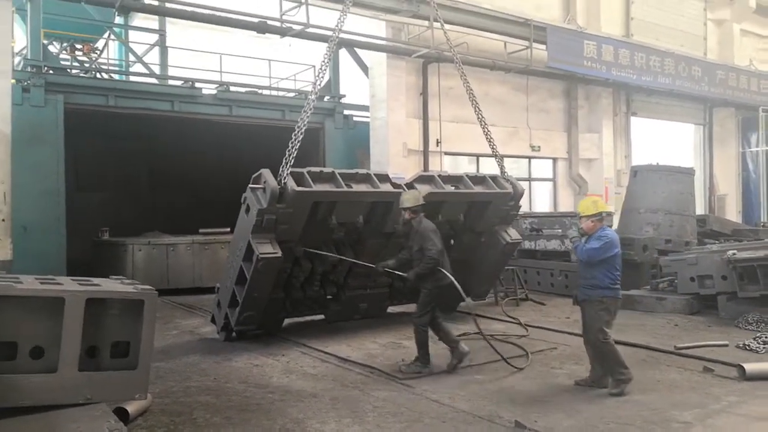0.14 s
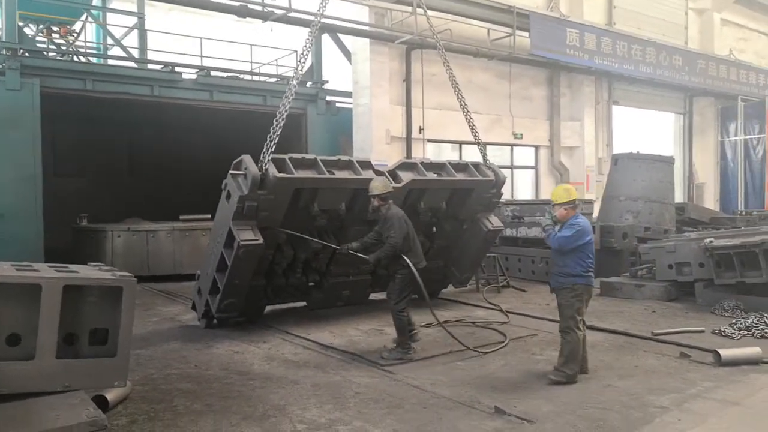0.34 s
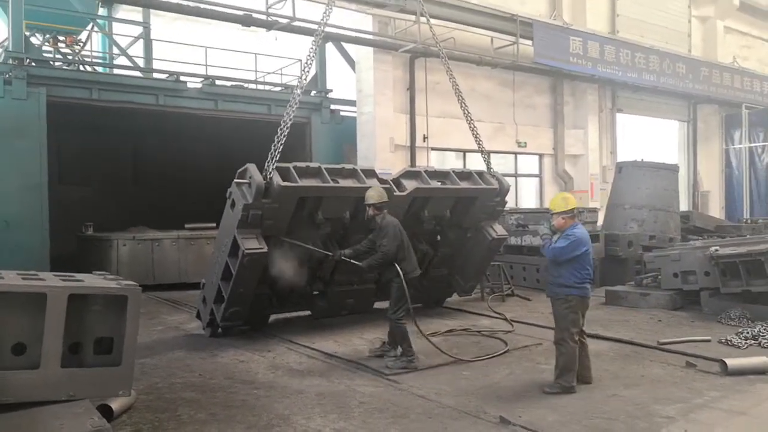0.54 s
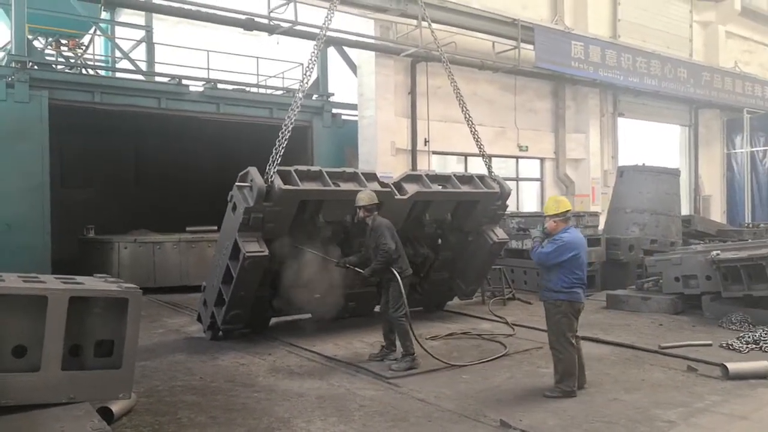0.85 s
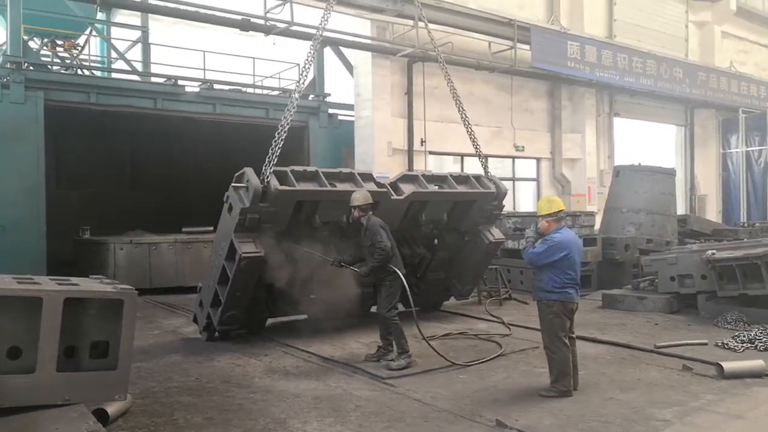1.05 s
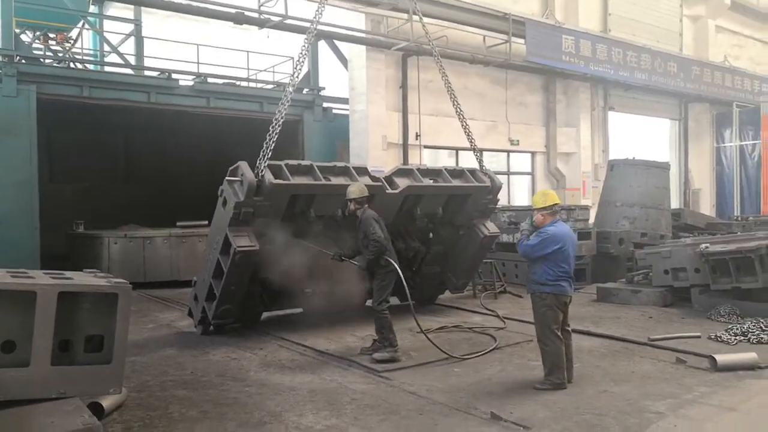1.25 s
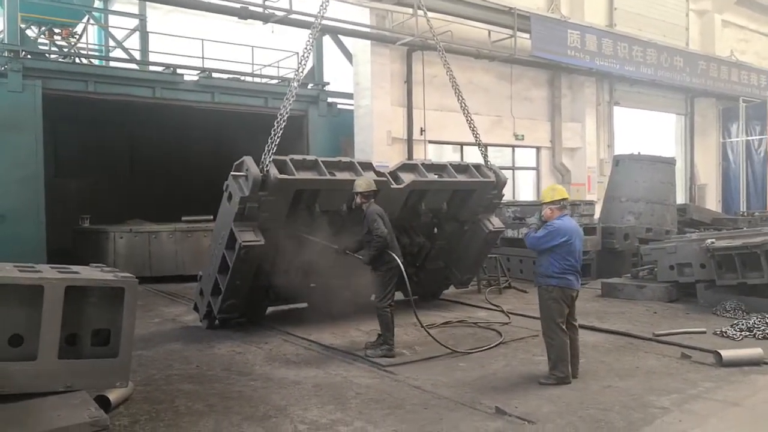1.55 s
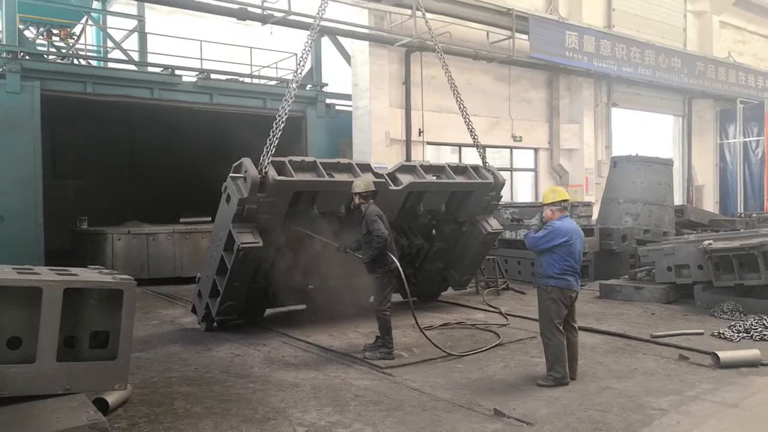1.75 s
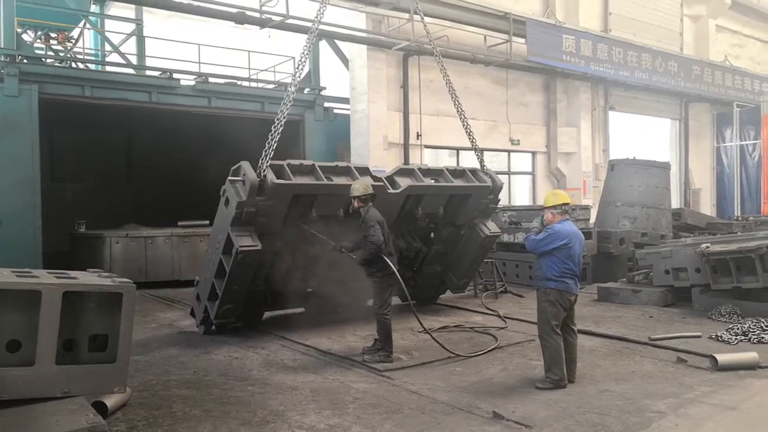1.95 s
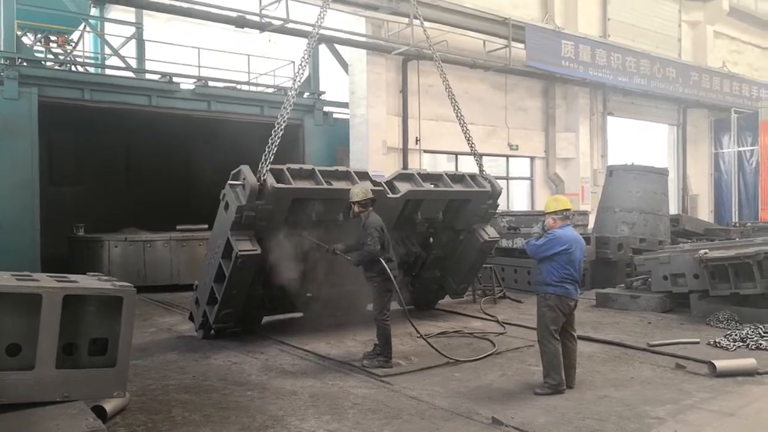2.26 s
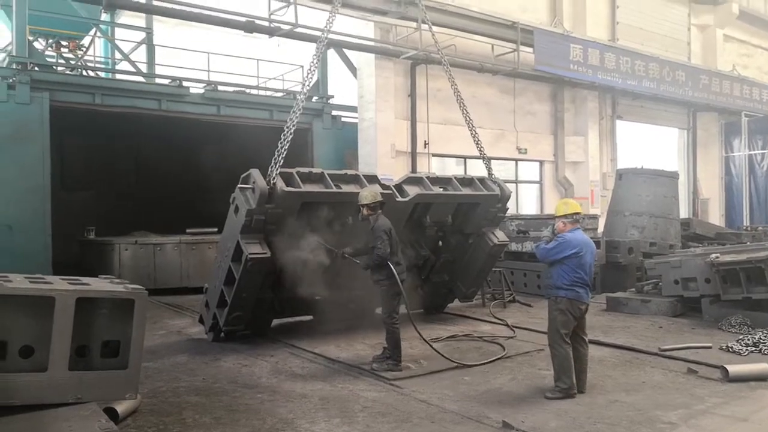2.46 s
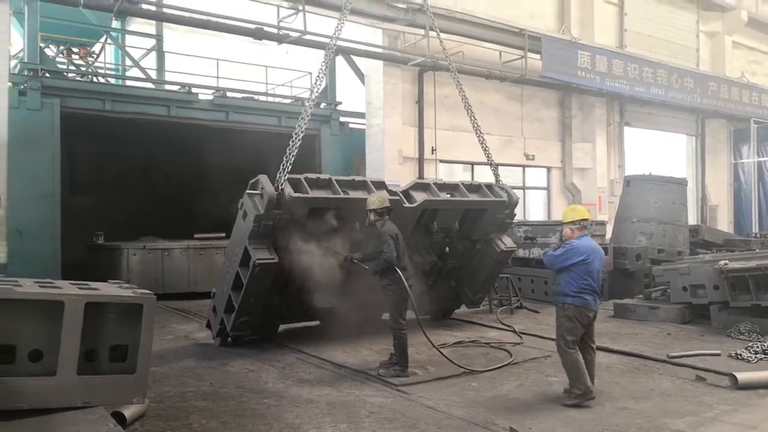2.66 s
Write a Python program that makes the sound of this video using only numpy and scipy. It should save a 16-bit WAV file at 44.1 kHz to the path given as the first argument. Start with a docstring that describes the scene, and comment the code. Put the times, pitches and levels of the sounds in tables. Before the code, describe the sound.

Compressed air hisses loudly over a heavy metal casting, swelling from 0 to full by about 0.25 s, then steady with slight wavering to the end, with a fuzzy, high whistle near 6 kHz. It sits right; the left is duller. A metal crash rings and fades over the first second. Dull metal knocks come faintly at 0.8 s, stronger around 1.9, 2.3 and 2.7 s. Low hall wash and hum throughout.

```python
"""A large hall holds a low wash and hum throughout, while a metal crash at the start dies away.
Almost at once an air lance opens off to the right and hisses over a ribbed metal casting.
Its nozzle whistles near 6 kHz; dull knocks on heavy metal follow from 0.8 s on.
Hiss, whistle, wash and thuds are shaped noise; the metal rings are sums of fading tones.
The noise in the left channel is much duller, and the lance reaches the left later."""
import sys
import numpy as np
from scipy import signal
from scipy.io import wavfile
from scipy.ndimage import uniform_filter1d

SR = 44100
rng = np.random.default_rng(int(sys.argv[2]) if len(sys.argv) > 2 else 0)


def wrap_up_sound(samples):
    """Save the sound to the file named by the first command line argument, as 16-bit audio."""
    columns = np.atleast_2d(samples).T
    # keep every value between -1 and 1, then stretch to whole-number steps
    tamed = np.clip(columns, -1, 1)
    steps = np.round(tamed * 32767).astype(np.int16)
    wavfile.write(sys.argv[1], SR, steps)


def undo_db(level):
    """Turn decibels back into plain size, where 20 dB means ten times bigger."""
    steps = np.asarray(level, float) / 20
    return 10 ** steps


N = 123921  # length in samples
OPEN_S = 0.24  # time by which the valve is open

# how alike left and right are in the hall, 1 = same, -1 = opposite: pitch_hz, likeness
LIKENESS = [(60, 1), (200, 0.91), (320, 0.84), (500, -0.46), (750, -0.3), (1150, 0.25), (1800, 0.24),
            (3000, 0.54)]


def evened(x):
    """Scales to rms 1."""
    return x / np.sqrt(np.mean(x ** 2) + 1e-20)


def read(points, hz):
    """Reads a spectrum table on a log-frequency axis, since pitch is heard in ratios."""
    f, value = np.transpose(points)
    return np.interp(np.log(hz + 1), np.log(f + 1), value)


def along(table, t, axis=1):
    """Reads one column of a time table, with straight lines between its rows."""
    rows = np.array(table)
    return np.interp(t, rows[:, 0], rows[:, axis])


def grid(size):
    """Gives bin frequencies in Hz (column) and frame times in s (row)."""
    hz = np.fft.rfftfreq(size, 1 / SR)[:, None]
    return hz, np.arange(4 * N // size + 5) * size / 4 / SR


def blotches(hz, t, bins, frames):
    """Smooth random field over frequency and time, made by averaging random numbers."""
    field = rng.standard_normal((len(t), len(hz))).T
    field = uniform_filter1d(field, bins, 0, mode="wrap")
    return evened(uniform_filter1d(field, frames, 1, mode="wrap"))


def noise(hz, db, likeness):
    """Stereo noise from a dB field: left shares part of right, adds its own part and has its own tone colour."""
    # level of left against right at each pitch: pitch_hz, left_minus_right_db
    left_colour = [(400, 0.5), (750, -2.5), (1150, -1), (1750, -4.5), (2700, -12.5), (4100, -13),
                   (5600, -19.5), (8500, -48), (11000, -19), (13300, -42), (14100, -50)]
    a, b, c, d = rng.standard_normal((db.shape[1], len(hz), 4)).T
    right = a + 1j * b
    own_part = np.sqrt(1 - np.clip(abs(likeness), 0, 1) ** 2) * (c + 1j * d)
    left = likeness * right + own_part
    left_gain = undo_db(read(left_colour, hz))
    # db sets the level of the average of left and right
    mid_size = np.sqrt(1 + left_gain ** 2 + 2 * left_gain * np.real(likeness))
    z = np.array([left_gain * left, right]) * undo_db(db) / mid_size
    size = 2 * len(hz) - 2
    return signal.istft(z, nperseg=size, noverlap=3 * size // 4)[1][:, :N]


def mid_scale(hz, db, lo_hz, hi_hz):
    """dB offset that gives the field's mean spectrum unit mid level in a band."""
    inside = (hz[:, 0] > lo_hz) & (hz[:, 0] < hi_hz)
    power = (undo_db(db) ** 2).mean(1)[inside].sum()
    return -10 * np.log10(power / 4)


def narrow_line(hz, f, width, level_db):
    """Power of a fuzzy tone: a narrow peak of noise, width in Hz between its -6 dB points."""
    line = -20 * np.log10(1 + (2 * (hz - f) / width) ** 2)
    return undo_db(line + mid_scale(hz, line, 0, SR) + level_db) ** 2


def from_right(hz):
    """Likeness for a source on the right: left hears it late, with one reflection."""
    share, lag_s = 0.62, 0.000612
    reflection, reflection_s = 0.13, 0.00024
    direct = share * np.exp(-2j * np.pi * hz * lag_s)
    return direct * (1 + reflection * np.exp(-2j * np.pi * hz * reflection_s))


def ring(modes, t):
    """Fading tones whose size and phase wander as the hall smears them; alike left and right when low."""
    smear_most, smear_hz, smear_full_hz = 1.1, 13, 400
    out = np.zeros((2, N))
    coarse_time = np.arange(0, N + 64, 64) / SR
    for f, db, t60 in modes:
        apart = np.arccos(np.clip(read(LIKENESS, f), -1, 1)) * np.array([[-.5], [.5]])
        smear = smear_most * min(f / smear_full_hz, 1) ** 2  # low modes stay cleaner
        rate, turn = rng.random((2, 8, 1))
        turns = smear_hz * (2 * rate - 1) * coarse_time + turn
        drift = np.exp(2j * np.pi * turns).sum(0) / np.sqrt(len(rate))
        wander = np.repeat(1 + smear * drift, 64)[:N] / np.sqrt(1 + smear ** 2)
        tone = np.exp(2j * np.pi * (f * t + rng.random()))
        out += undo_db(db - 60 * t / t60) * np.real(wander * tone * np.exp(1j * apart))
    return out


def hall():
    """Low machine wash of shaped noise, a wavering hum of narrow noise and a steady mains hum."""
    # colour of the wash, before it is scaled to its level: pitch_hz, level_db (per Hz)
    wash_spectrum = [(12, -44), (20, -12.5), (93, -1.5), (134, 0), (256, 0), (284, -1.5), (333, -2.5),
                     (480, -12.5), (1070, -9), (1690, -12), (2860, -120)]
    # the wavering hum, before the swell: pitch_hz, level_db, width_hz
    hum_lines = [(242.6, -44, 15)]
    # slow rise and fall of everything here: start_s, level_db
    swell = [(0, 5), (.35, 4), (.7, 0.5), (1.3, 0.5), (1.8, 1.5), (2.1, 2.5), (2.4, 4), (2.8, 2.5)]
    wash_db, patch_db = -34.5, 1.44  # before the swell
    mains_hz, mains_db = 99.3, -47.5  # before the swell
    hz, t = grid(size=4096)
    shape = read(wash_spectrum, hz) + 0 * t
    level = mid_scale(hz, shape, 0, SR) + wash_db
    power = undo_db(shape + level + patch_db * blotches(hz, t, 8, 4)) ** 2
    for f, db, width in hum_lines:
        power += narrow_line(hz, f, width, db)
    wash = noise(hz, 10 * np.log10(power), read(LIKENESS, hz))
    time = np.arange(N) / SR
    mains = undo_db(mains_db) * np.sqrt(2) * np.sin(2 * np.pi * (mains_hz * time + rng.random()))
    return undo_db(along(swell, time)) * (wash + mains)


def crash():
    """Tail of falling metal in the hall: fading noise plus the ringing modes of the metal."""
    # fading of the noise: start_s, level_db
    fade_points = [(0, -20), (.25, -23), (.36, -26.5), (.5, -24.5), (.68, -33), (1.1, -38), (1.9, -54)]
    # colour of the noise, before it is scaled to its level: pitch_hz, level_db (per Hz)
    crash_spectrum = [(80, -24), (150, -9), (280, -17), (450, -11.5), (800, -3.5), (1300, -3.5),
                      (1800, -6.5), (2500, -17.5), (4000, -29), (7000, -36), (12000, -55)]
    # ringing tones, levels against each other: pitch_hz, level_db, time_to_fall_60_db_s
    crash_modes = [(280.8, 4, 2.1), (361.4, 0, 5.2), (502, -0.5, 6.7), (633, -5, 0.84), (758, 4, 1.3),
                   (879, 0.5, 7.5), (970, 0.5, 2.5), (1163, -12, 1.2), (1267, -4, 2.3), (1355, -1, 6.5),
                   (1717, -0.5, 6.4)]
    ring_db, ring_rise_s = -27, 0.016
    ring_hold_s, ring_drop_db = 0.29, -5.5
    hz, t = grid(size=1024)
    shape = read(crash_spectrum, hz) + 0 * t
    fade = along(fade_points, t) - 30 * np.maximum(t - fade_points[-1][0], 0)
    db = shape + mid_scale(hz, shape, 500, 1300) + fade
    tail = noise(hz, db, read(LIKENESS, hz))
    time = np.arange(N) / SR
    # the ring swells, then is partly damped
    damping = undo_db(ring_drop_db * np.clip((time - ring_hold_s) * 20, 0, 1))
    swell = (1 - np.exp(-time / ring_rise_s)) * damping
    return tail + undo_db(ring_db) * swell * ring(crash_modes, time)


def jet():
    """Turbulent air hiss; pockets of the casting lift bands that waver as the lance moves."""
    # levels while the valve opens and after: start_s, hiss_db, treble_db, low_roar_db
    flow = [(0, -33, -67, -52), (.15, -28, -57, -43), (.19, -25.5, -44, -43), (.225, -20.5, -34, -35),
            (.33, -20.5, -35, -33), (.58, -19.5, -39, -30), (.65, -17.5, -37, -29),
            (.85, -20.5, -39.5, -26.5), (1.0, -18, -32, -25), (1.08, -19.5, -33, -24.5),
            (1.26, -19.5, -37, -28), (1.39, -19, -27.5, -25), (1.49, -19.5, -37.5, -23.5),
            (1.6, -20, -35, -24.5), (1.72, -19, -34.5, -28), (1.9, -18, -36, -26.5),
            (1.96, -19.5, -41.5, -23.5), (2.14, -20, -36.5, -28.5), (2.22, -21.5, -45, -24),
            (2.36, -23, -48, -27), (2.48, -20, -40, -25), (2.65, -20, -35, -29.5), (2.8, -19, -41, -23.5)]
    # colour of the air, before its bands are scaled to the flow: pitch_hz, level_db (per Hz)
    jet_spectrum = [(300, -35), (1100, -18), (1600, -2.5), (2050, -4), (2600, -9.5), (3200, -12),
                    (4800, -11.5), (6800, -13.5), (8300, -15), (9500, -15.5), (12000, -24), (14900, -35.5)]
    # middle values of the lifted bands: pitch_hz, width_hz, lift_db
    pockets = [(2110, 250, 6), (2880, 200, 4), (3530, 220, 4.5), (5700, 900, 3), (7600, 900, 5),
               (9160, 410, 5)]
    waver_db, slide_share = 1., .02  # random wavering of the pockets' lift and pitch
    patch_db, flicker_db = 1.1, .8
    roar_below_hz, treble_from_hz = 2500, 9000
    hollow_hz, hollow_width_hz, hollow_db = 4230, 1700, -4.5
    hz, t = grid(size=512)
    shape = read(jet_spectrum, hz) + 0 * t
    waver = blotches(np.array(pockets), t, bins=1, frames=30)
    slide = 1 + slide_share * blotches(np.array(pockets), t, bins=1, frames=60)
    for (f, width, lift_db), w, s in zip(pockets, waver, slide):
        bump = np.exp(-.5 * (2 * (hz - f * s) / width) ** 2)
        shape += (lift_db + waver_db * w) * bump
    hiss = mid_scale(hz, shape, roar_below_hz, treble_from_hz) + along(flow, t, axis=1)
    treble = mid_scale(hz, shape, treble_from_hz, SR) + along(flow, t, axis=2)
    roar = mid_scale(hz, shape, 1400, roar_below_hz) + along(flow, t, axis=3)
    # blend the three levels smoothly across pitch
    high = 1 / (1 + (treble_from_hz / (hz + 1)) ** 10)
    low = 1 / (1 + (hz / roar_below_hz) ** 10)
    db = shape + high * treble + low * roar + (1 - high - low) * hiss
    # the half-shut valve leaves the mid band emptier
    shut = np.clip((OPEN_S - t) * 20, 0, 1)
    db += hollow_db * shut * np.exp(-.5 * (2 * (hz - hollow_hz) / hollow_width_hz) ** 2)
    db += patch_db * blotches(hz, t, 6, 20)
    db += flicker_db * blotches(hz, t, 80, 4)
    return noise(hz, db, from_right(hz))


def whistle():
    """Fuzzy nozzle tone of narrow noise, with a faint steady partial about an octave up."""
    # the gliding main tone: start_s, pitch_hz, level_db
    glide = [(0, 5970, -29.5), (.2, 6000, -27), (.6, 5820, -32), (1.2, 5860, -29), (1.75, 5950, -27),
             (2.25, 5740, -37), (2.8, 5750, -27.5)]
    width_hz, wider_open_hz = 280, 280  # the second is added once the valve is open
    octave_hz, octave_db = 12400, -60
    hz, t = grid(size=512)
    width = width_hz + wider_open_hz * np.clip((t - OPEN_S) * 10, 0, 1)
    power = narrow_line(hz, along(glide, t), width, along(glide, t, axis=2))
    power = power + narrow_line(hz, octave_hz, width, octave_db)
    return noise(hz, 10 * np.log10(power), from_right(hz))


def echoes(x):
    """Dense reflections off casting and floor: a short noise tail of its own in each microphone."""
    echoes_db, t60_s = -9, .3  # level against the direct sound, time to fall by 60 dB
    t = np.arange(SR // 2) / SR
    tail = rng.standard_normal((len(t), 2)).T * undo_db(-60 * t / t60_s)
    tail *= undo_db(echoes_db) / np.linalg.norm(tail[0])
    reflected = signal.fftconvolve(x, tail, axes=1)[:, :N]
    return (x + reflected) / np.sqrt(1 + undo_db(echoes_db) ** 2)


def knocks():
    """Distant blows on heavy metal: a swelling thud of noise and low ringing modes."""
    # the blows: start_s, level_db, ringing_length_s, thud_over_ring_db
    blows = [(.8, -41, 0.2, -3), (1.915, -30, 0.32, 11), (2.26, -28.5, 0.22, 5), (2.68, -33, 0.031, 0)]
    # ringing tones, levels against each other: pitch_hz, level_db, time_to_fall_60_db_s
    knock_modes = [(154.1, 8.5, 1.38), (183.7, -2, 2.8), (286, -2, 1.6), (339, -2.5, 2.3), (887, -5.5, 2),
                   (1118, 1.5, 1.54)]
    # colour of the thud, before it is scaled to its level: pitch_hz, level_db (per Hz)
    thud_spectrum = [(100, -30), (300, -27), (500, -4), (1000, 0.5), (2000, -10), (3500, 3.5),
                     (6000, -29.5)]
    rise_s, thud_t60_s = 0.053, 1.07
    damped_db_per_s = -110  # extra fading after the ringing length
    hz, t = grid(size=1024)
    shape = read(thud_spectrum, hz) + 0 * t
    thud = noise(hz, shape + mid_scale(hz, shape, 0, SR), read(LIKENESS, hz))
    out = np.zeros((2, N))
    time = np.arange(N) / SR
    for start, db, length, thud_db in blows:
        age = np.maximum(time - start, 0)
        damping = undo_db(damped_db_per_s * np.maximum(age - length, 0))
        ringing = ring(knock_modes, age) * damping
        body = ringing + thud * undo_db(thud_db - 60 * age / thud_t60_s)
        out += undo_db(db) * (1 - np.exp(-age / rise_s)) * body  # silent until the blow
    return out


def scene():
    """Adds all sources at the two microphones."""
    lance = echoes(jet() + whistle())
    return hall() + crash() + lance + knocks()


def top_cut(x):
    """Nothing passes above the cut-off."""
    return signal.sosfilt(signal.butter(12, 15030, fs=SR, output="sos"), x)


def record(dry):
    """Turns the finished mix into the sound that is written out."""
    return top_cut(dry)


dry = scene()
out = record(dry)
wrap_up_sound(out)
```